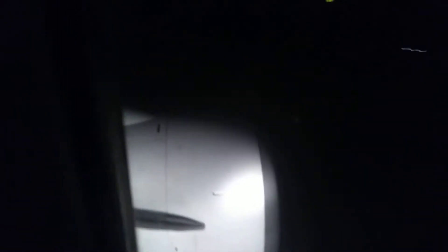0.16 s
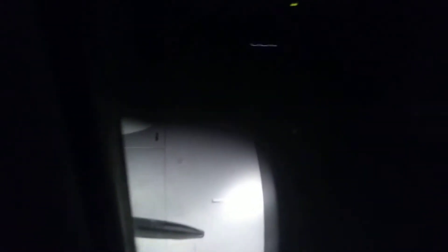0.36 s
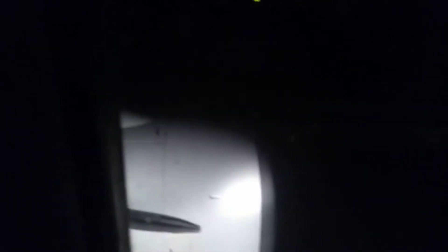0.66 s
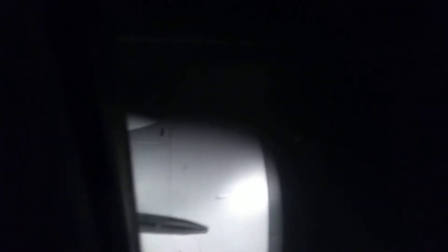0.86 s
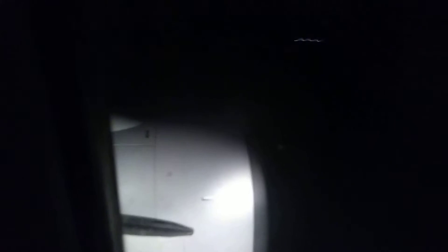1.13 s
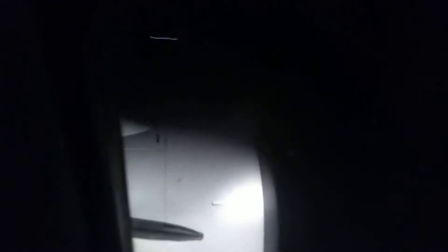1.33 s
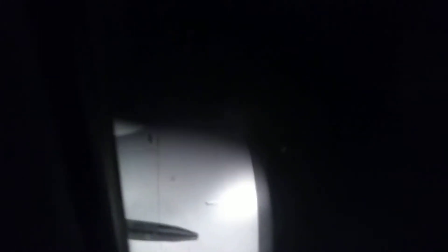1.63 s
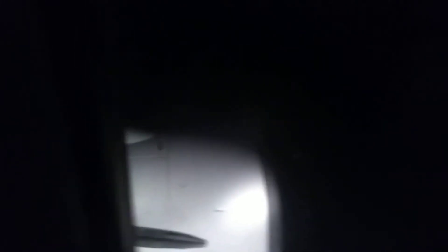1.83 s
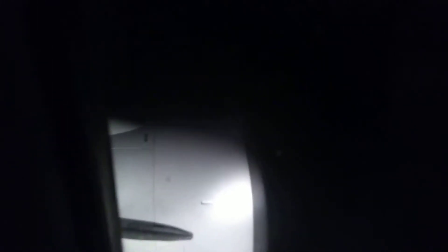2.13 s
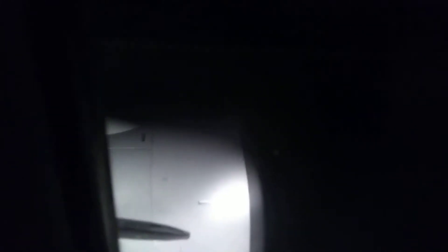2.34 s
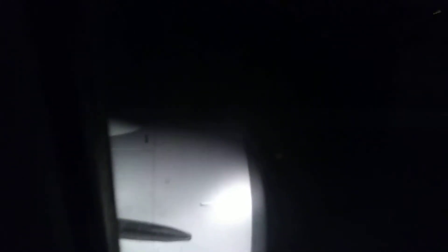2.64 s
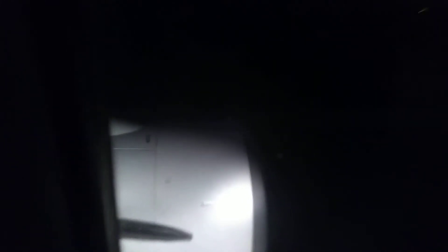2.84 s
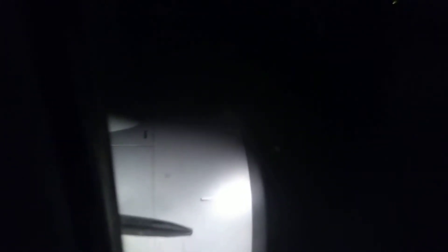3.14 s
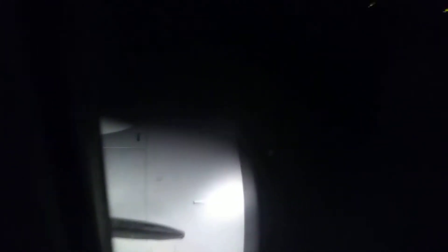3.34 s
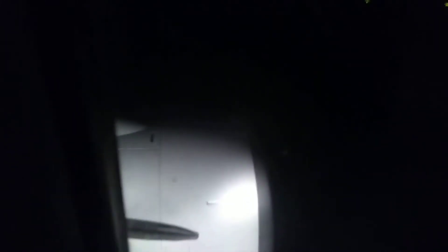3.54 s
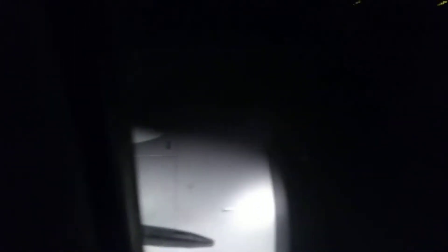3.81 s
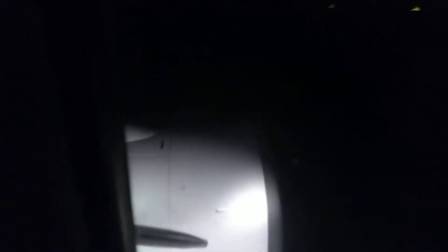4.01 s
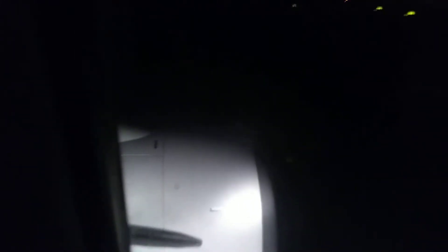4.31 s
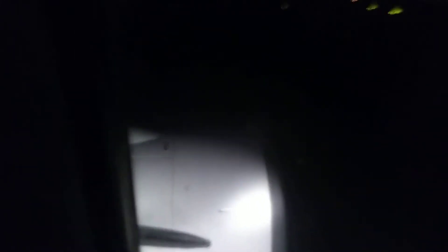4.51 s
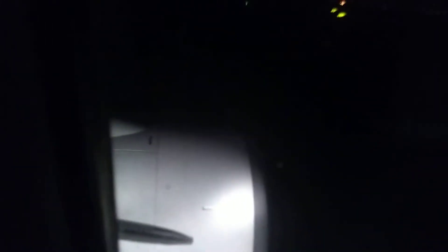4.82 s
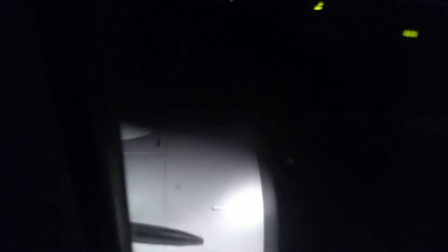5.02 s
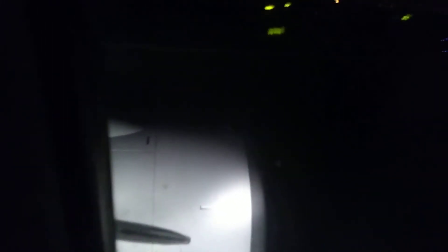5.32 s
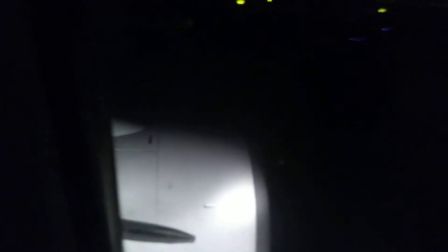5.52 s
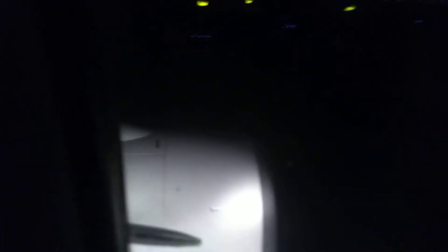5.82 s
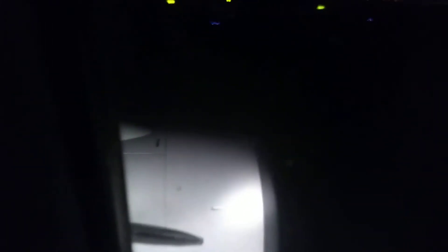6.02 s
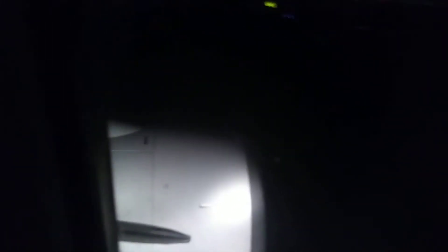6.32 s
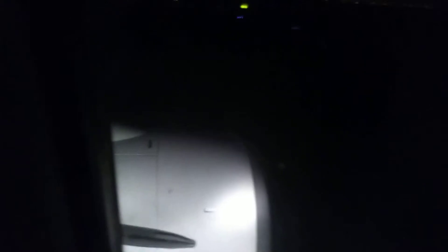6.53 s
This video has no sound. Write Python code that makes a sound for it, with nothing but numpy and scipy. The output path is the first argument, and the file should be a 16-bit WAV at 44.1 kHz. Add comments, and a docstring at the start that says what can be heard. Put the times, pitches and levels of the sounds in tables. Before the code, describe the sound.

Inside an airliner cabin, the wheels hit the runway at about 0.1 seconds with a short crack and a cluster of thumps. A deep tyre rumble follows, with a few dull bumps over a soft hiss of air and faint, thin engine tones. A loose plastic fitting ticks sharply and unevenly from the start, getting busier after 1.5 seconds. Reverse thrust swells from around 1 second and reaches a loud, deep roar by about 3 seconds, holding until the end near 6.7 seconds. From roughly 2 seconds, blunt knocks come at irregular intervals and the cabin panels shudder in quick, rough bursts, with heavier runway bumps after 3 seconds. The low pressure swings overload the small microphone, which rasps and chokes for instants, most densely between 1.6 and 2 seconds and occasionally afterwards. The air hiss grows brighter along with the roar.

```python
"""Inside an airliner on the runway: the wheels jolt and rumble, then reverse thrust swells to a roar.
A loose plastic cabin fitting ticks with the shaking, over a hiss of air and thin engine tones.
Runway bumps and jet buffeting shudder through the panels; the deep pressure swings overload
a small microphone, which rasps and briefly chokes."""
import sys
import numpy as np
from scipy import signal
from scipy.fft import rfft, irfft, next_fast_len
from scipy.io import wavfile
from scipy.ndimage import map_coordinates

SR = 44100
rng = np.random.default_rng(int(sys.argv[2]) if len(sys.argv) > 2 else 0)


def inscribe(sig):
    """Save sig as 16-bit PCM at rate SR to the path in sys.argv[1].

    A 1-D sig is mono; a 2-D sig holds one channel per row.
    Samples are clipped to [-1, 1] before scaling.
    """
    pcm = np.round(np.clip(np.atleast_2d(sig).T, -1, 1) * 32767)
    wavfile.write(sys.argv[1], SR, pcm.astype(np.int16))


N = 293706


def amp(db):
    """Decibels to gain."""
    return 10 ** (np.asarray(db) / 20)


def unit(x):
    """Scale to rms 1."""
    return x / np.sqrt(np.mean(x ** 2) + 1e-20)


def clock():
    """The time of every sample, in seconds."""
    return np.arange(N) / SR


def wobble(rate):
    """A smooth random curve, rate knots a second."""
    knots = rng.standard_normal(int(N * rate / SR) + 4)
    return map_coordinates(knots, [clock() * rate])


def colour(x, points):
    """Causal EQ whose gain follows (freq_hz, gain_db) points on a log axis."""
    m = 2 * next_fast_len(N // 2 + SR // 4)
    hz, db = np.transpose(points)
    gain_db = np.interp(np.log(np.fft.rfftfreq(m, 1 / SR) + 1), np.log(hz), db)
    cepstrum = irfft(np.log(amp(gain_db)), m)
    cepstrum[1:m // 2] *= 2  # fold to minimum phase: no ringing ahead of a hit
    cepstrum[m // 2 + 1:] = 0
    return irfft(rfft(x, m) * np.exp(rfft(cepstrum)), m)[:N]


def noise(points):
    """Noise of rms 1, coloured by (freq_hz, gain_db) points."""
    return unit(colour(rng.standard_normal(N), points))


def window(s, length):
    """A flat-topped envelope centred on s seconds."""
    out = np.zeros(N)
    near = np.arange(max(int((s - length) * SR), 0), min(int((s + length) * SR), N))
    out[near] = np.exp(-np.abs(2 * (near / SR - s) / length) ** 6)
    return out


def saturate(x, top, hardness):
    """Soft-clip at top; more hardness gives a tighter knee."""
    return x / (1 + np.abs(x / top) ** hardness) ** (1 / hardness)


def thrust(full_s=3.23):
    """Reverse thrust ramps from 0 (idle) to 1 (full) and holds."""
    return np.clip(clock() / full_s, 0, 1)


def roar_level(full_db=-7.5, spool_up_db=30.5):
    """The roar's envelope in dB: it climbs fast at first and eases into full thrust."""
    return full_db - spool_up_db * (1 - thrust()) ** 2


def shakes(chance, from_s=1.4, crowding=.8):
    """Turn chances 0-1 into moments of cabin shaking, which crowd in towards the end."""
    return from_s + (N / SR - from_s) * chance ** crowding


def rumble(wheel_db=-9.5, lumpy_db=1, settle_s=1.0, settle_db=2.5, heave_db=-20.5):
    """Wheels and reversed jets boom through the fuselage; the cabin air heaves below hearing."""
    # tyres on the runway: freq_hz, gain_db
    runway_eq = [(15, -4), (40, -6.5), (62, -1.5), (82, -0.5), (125, -1), (160, -5.5), (220, -8.5),
                 (260, -13.5), (325, -13.5), (375, -24), (500, -35), (800, -45.5), (2000, -86),
                 (6000, -110)]
    # reversed jets: freq_hz, gain_db
    roar_eq = [(25, -14), (55, -9.5), (80, -2.5), (100, -1.5), (125, 2), (160, -4.5), (235, -3),
               (260, -11.5), (290, -6.5), (325, -7), (360, -16), (520, -29.5), (1500, -47.5), (3300, -49),
               (8000, -91.5)]
    idle = 1 - thrust()
    unloaded = np.maximum(1 - clock() / settle_s, 0)  # falls as the weight settles on the wheels
    rolling_db = wheel_db - 2.5 * idle - settle_db * unloaded
    wheels = amp(rolling_db + lumpy_db * wobble(9)) * noise(runway_eq)
    jets = amp(roar_level()) * noise(roar_eq)
    heave = amp(heave_db - 7 * idle) * wobble(25)
    return wheels + jets + heave


def air(rush_db=-36.5, rush_swell_db=6, hiss_trim_db=2.5, whine_trim_db=-1, waver=0.0019):
    """Air rushes along the skin and from the vents, louder with thrust, with thin engine tones in it."""
    # broad rush of air: freq_hz, gain_db
    rush_eq = [(200, 1.5), (600, 0.5), (1100, -0.5), (1750, -2.5), (2200, 1), (2700, -5.5), (3350, -9.5),
               (3900, -8.5), (4400, -8), (5150, -1.1), (5900, -13), (7500, -28), (12000, -54)]
    # bright hiss of air: freq_hz, gain_db
    hiss_eq = [(3000, -33), (5000, -9.5), (6500, -3), (9300, -9), (10500, -17.5), (11500, -22.5),
               (13500, -33.5), (15600, -35.5)]
    # the hiss's envelope, before trim: time_s, level_db
    hiss_envelope = [(0.0, -56), (0.39, -71.5), (1.25, -62.5), (1.5, -57), (2.3, -56.5), (3.34, -52),
                     (6.16, -52.5), (6.66, -49.5)]
    # engine tones, before trim: pitch_hz, level_db
    whines = [(1491, -58), (2164, -63), (2988, -67)]
    hiss_db = np.interp(clock(), *np.transpose(hiss_envelope))
    flutter_db = 0.3 * wobble(41)
    out = amp(rush_db - rush_swell_db * (1 - thrust() ** 2) + flutter_db) * noise(rush_eq)
    out += amp(hiss_db + hiss_trim_db + flutter_db) * noise(hiss_eq)
    for hz, db in whines:
        phase = 2 * np.pi * np.cumsum(hz * (1 + waver * wobble(12))) / SR
        out += amp(db + whine_trim_db) * np.sqrt(2) * np.sin(phase)
    return out


def touchdown(at_s=.0995, length_s=.007, crack_db=-34):
    """A sharp crack as the gear takes the load."""
    crack_eq = [(800, -1), (2800, 4), (5500, 7.0), (9000, -9), (14000, -40)]  # freq_hz, gain_db
    return amp(crack_db) * window(at_s, length_s) * noise(crack_eq)


def overload(pressure, give=0.13, choke_db=-26.5, lurch=0.24, brief_s=0.0032, brief_count=2):
    """The diaphragm stiffens against big swings; a hard jolt throws it to its stop and chokes it."""
    # the hardest jolts on the microphone: centre_s, length_s
    hard_jolts = [(.1058, .004), (.127, .004), (.132, .004), (.137, .004), (1.6122, .0037), (1.6595, .0058),
                  (1.7327, 0.0046), (1.7482, 0.0073), (1.7875, .0095), (1.8115, 0.004), (1.8223, 0.0046),
                  (1.8369, .006), (1.869, 0.005), (1.9545, .0062), (2.5954, .005), (3.0256, .007),
                  (3.4856, .0046), (3.615, .005), (3.9103, 0.0039), (4.5924, 0.0036), (4.6354, 0.0056),
                  (4.9014, 0.0052), (5.5787, 0.0034), (6.3123, .0045)]
    motion = (1 - give) * saturate(pressure, top=0.66, hardness=7) + give * pressure
    chokes = list(hard_jolts) + [(s, brief_s) for s in shakes(rng.random(brief_count))]
    stuck = np.minimum(sum(window(s, length) for s, length in chokes), 1)
    speed = np.diff(motion, prepend=0) * amp(choke_db * stuck)
    lurches = np.zeros(N)
    for s, length in chokes:
        arch = np.maximum(1 - (2 * (clock() - s) / length) ** 2, 0)
        lurches += rng.choice([-1, 1]) * arch
    # summing the speed gives the position, which creeps back to rest through a 10 Hz leak
    position = signal.lfilter([1], [1, -np.exp(-2 * np.pi * 10 / SR)], speed)
    return position + lurch * lurches


def knocks(drive_db=24, small_db=-16, spread_db=9, count=30):
    """Each jolt is one blunt push with no ring; the lesser ones come at random and grow with the roar."""
    # the loudest knocks of gear and buffeting, before drive and EQ: start_s, level_db
    big_knocks = [(.1085, -29), (.1235, -25.5), (.134, -27), (.142, -27), (2.105, -20), (2.286, -18.5),
                  (2.414, -19), (2.496, -18), (2.547, -19), (2.763, -19.5), (2.993, -18), (3.619, -19),
                  (4.133, -15.5), (4.318, -16.5), (4.376, -17), (4.456, -17), (4.685, -17.5),
                  (4.908, -18.5), (4.936, -15.5), (5.148, -21.5), (5.249, -14.5), (6.183, -17),
                  (6.331, -15.5), (6.389, -12.5), (6.518, -15), (6.567, -18), (6.632, -13.5)]
    # a dull thud: freq_hz, gain_db
    thud_eq = [(150, -5.5), (450, 16), (800, 8), (1300, -5.5), (2200, -28), (4000, -35.5), (10000, -59)]
    when, size = rng.random((count, 2)).T
    times = shakes(when)
    levels = np.interp(times, clock(), roar_level()) + small_db - spread_db * size
    pushes = np.zeros(N)
    for s, db in list(big_knocks) + list(zip(times, levels)):
        pushes[min(round(s * SR), N - 1)] = amp(db + drive_db) * rng.choice([-1, 1])
    return colour(pushes, thud_eq)


def bumps():
    """Each bump of the runway sends a dull shudder through the cabin panels."""
    # runway bumps: centre_s, length_s, level_db
    hits = [(0.123, .045, -36), (0.625, 0.031, -41), (0.745, .08, -42), (1.298, 0.073, -37.5),
            (1.807, 0.053, -33), (2.288, 0.033, -37), (2.441, 0.064, -31), (3.295, 0.15, -26),
            (3.472, 0.13, -25.5), (3.656, 0.088, -25.5), (3.772, 0.044, -26), (3.94, 0.039, -28),
            (4.185, 0.064, -27), (4.398, .05, -26.5), (4.698, 0.031, -28), (4.918, 0.079, -33.5),
            (5.239, 0.08, -25.5), (5.494, 0.042, -32.5), (5.84, 0.065, -27), (6.147, 0.12, -27),
            (6.354, .09, -28)]
    # shuddering panels: freq_hz, gain_db
    shudder_eq = [(200, -14), (380, -1.5), (500, 0.5), (750, -5.5), (1100, -14), (1600, -24.5), (6000, -72)]
    envelope = sum(amp(db) * window(s, length) for s, length, db in hits)
    return envelope * noise(shudder_eq)


def rattle(drive_db=5.5, small_db=-35.5, spread_db=7, ring_db=-17, count=150):
    """The loose fitting chatters: each contact is a crack with a short plastic ring."""
    # the fitting's loudest ticks, before drive and EQ: start_s, level_db
    big_ticks = [(0.189, -27.5), (0.2318, -31.5), (0.7501, -29.5), (0.807, -29.5), (0.9506, -27.5),
                 (1.019, -22), (1.1397, -29.5), (1.1946, -26), (1.3336, -20), (1.3851, -23.5),
                 (1.4499, -30.5), (1.6444, -26.5), (1.6964, -23), (1.7523, -24), (1.8144, -23),
                 (1.8761, -26.5), (1.9836, -26.5), (2.029, -20.5), (2.0875, -30), (2.2436, -26),
                 (2.293, -27), (2.473, -27.5), (2.641, -18), (2.6864, -26), (2.7873, -24), (2.838, -22),
                 (2.8901, -25), (2.9381, -17.5), (3.041, -18.5), (3.147, -25.5), (3.1924, -27),
                 (3.3965, -20), (3.5566, -23), (3.709, -24), (3.7635, -24), (3.817, -21), (3.9175, -24.5),
                 (3.9458, -21.5), (4.0031, -24), (4.0733, -18), (4.143, -22.5), (4.3108, -28.5),
                 (4.6027, -20.5), (4.6534, -22.5), (4.855, -19.5), (5.0278, -22), (5.3335, -19),
                 (5.5534, -22), (5.6053, -24.5), (6.0, -21), (6.0794, -24), (6.3228, -26.5), (6.5758, -23)]
    # resonances of the plastic: freq_hz, gain_db
    plastic_eq = [(1000, -24), (4050, -16), (4400, -1), (4620, -4.5), (4850, 4), (5150, -1), (5750, -8.5),
                  (6300, -8.5), (7050, -13.5), (7400, -10), (8200, -14.5), (10200, -20), (11600, -32.5),
                  (15500, -39.5)]
    rise_s, crack_t60_s, ring_t60_s = 0.00059, .012, 0.061
    t = np.arange(SR // 25) / SR
    attack = 1 - np.exp(-t / rise_s)
    envelope = attack * (amp(-60 * t / crack_t60_s) + amp(ring_db - 60 * t / ring_t60_s))
    when, size = rng.random((count, 2)).T
    small_ticks = zip(shakes(when), small_db + spread_db * size ** 2)  # mostly faint
    contacts = np.zeros(N + SR)
    for s, db in list(big_ticks) + list(small_ticks):
        burst = envelope / envelope.max() * rng.choice([-1, 1], len(t))
        contacts[round(s * SR):][:len(t)] += amp(db + drive_db) * burst
    return colour(contacts[:N], plastic_eq)


def sizzle():
    """Two short, faint patches of high hiss."""
    # sizzling patches: centre_s, length_s, level_db
    patches = [(0.582, 0.13, -54.5), (1.078, 0.14, -54.5)]
    envelope = sum(amp(db) * window(s, length) for s, length, db in patches)
    return envelope * noise([(5500, -59), (6700, -1.5), (7900, -7), (9000, -29), (12000, -49.5)])


def judder(full_s=2.74, full_db=-33, rough_db=5, rise_db_per_s=22, fall_db_per_s=.5):
    """The reversed jets buffet the panels in quick, uneven bursts that ease as the aircraft slows."""
    # buffeted cabin panels: freq_hz, gain_db
    panel_eq = [(250, -23), (480, -0.5), (800, -3.5), (1400, -11), (2200, -26), (6000, -58)]
    since = clock() - full_s
    swell_db = np.minimum(rise_db_per_s * since, -fall_db_per_s * since)
    roughness = amp(rough_db * np.clip(wobble(120), -2, 2))
    bursts = unit(roughness * noise(panel_eq))
    return amp(full_db + swell_db) * bursts


def fizz(below_roar_db=56):
    """A faint, very high fizz that comes up with the roar."""
    # top-end fizz: freq_hz, gain_db
    fizz_eq = [(8000, -38), (11000, -7.5), (12200, 3.5), (13400, -15), (14500, -10), (15600, -6.5)]
    return amp(roar_level() - below_roar_db) * noise(fizz_eq)


def scene():
    """The overloading roar as a bed, with the short sounds riding on top, in mono."""
    pressure = rumble() + judder() + bumps() + air() + fizz()
    return (overload(pressure) + knocks() + rattle() + touchdown() + sizzle())[None]


def record(dry, low_cut_hz=85, top_hz=15850):
    """The microphone's electronics cut the deep bass, round the peaks and pass nothing above top_hz."""
    low_cut = signal.butter(2, low_cut_hz, "high", fs=SR, output="sos")
    thinned = signal.sosfilt(low_cut, dry)
    rounded = saturate(thinned, top=.9, hardness=7)
    m = next_fast_len(N + SR // 4)
    passband = np.fft.rfftfreq(m, 1 / SR) < top_hz
    return irfft(rfft(rounded, m) * passband, m)[..., :N]


dry = scene()
out = record(dry)
inscribe(out)
```